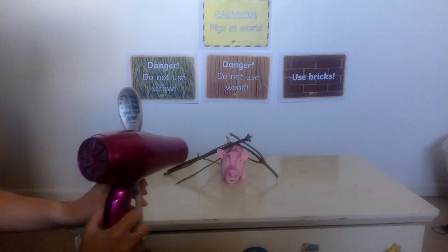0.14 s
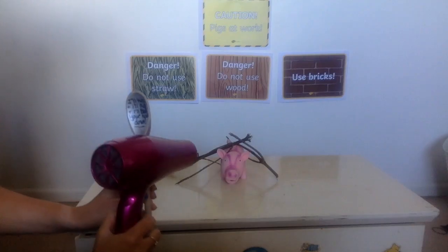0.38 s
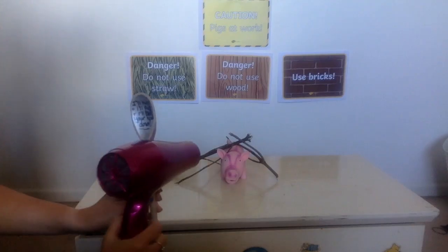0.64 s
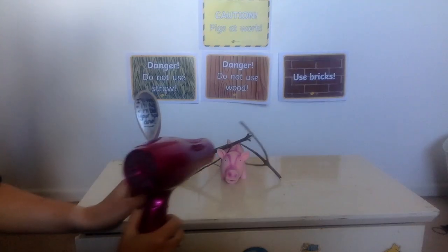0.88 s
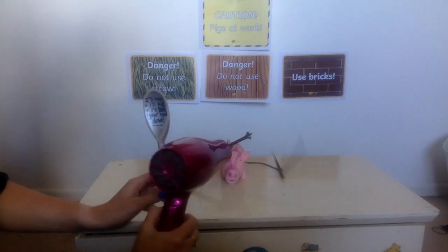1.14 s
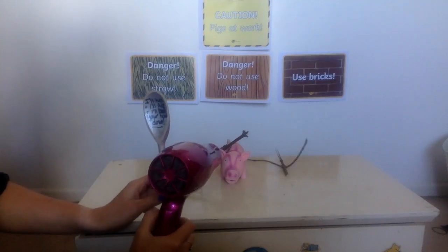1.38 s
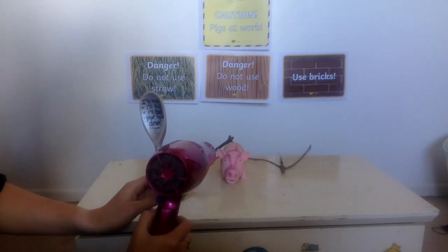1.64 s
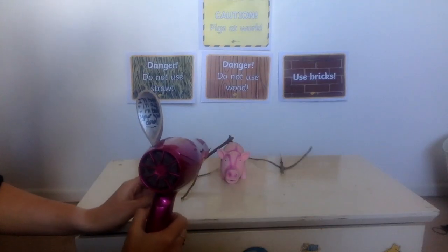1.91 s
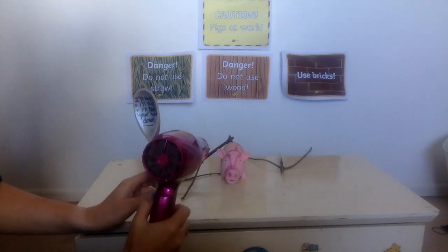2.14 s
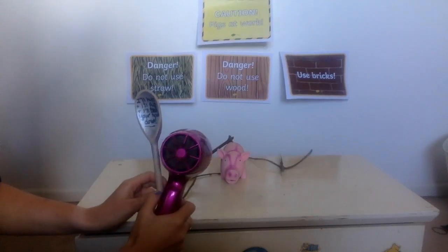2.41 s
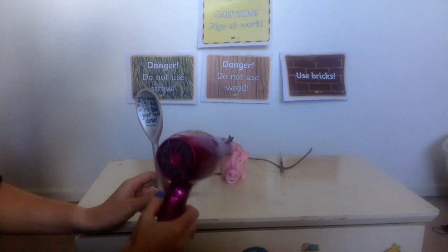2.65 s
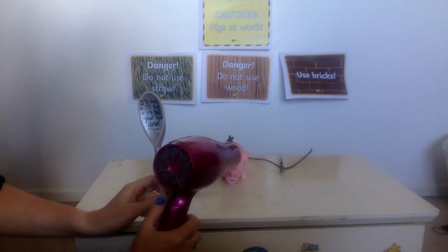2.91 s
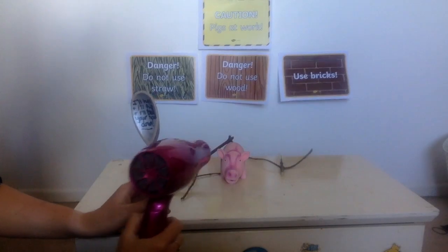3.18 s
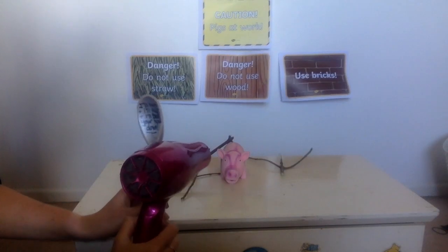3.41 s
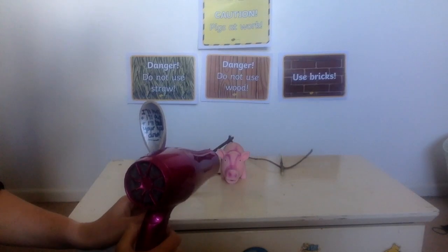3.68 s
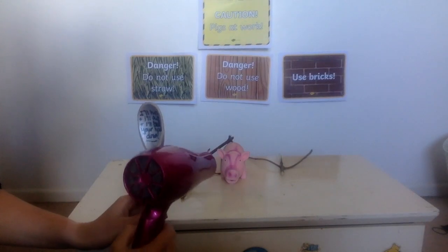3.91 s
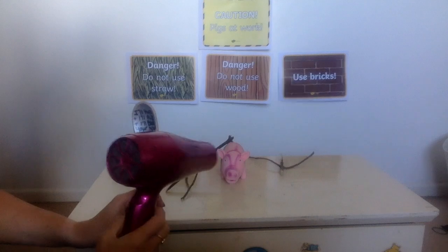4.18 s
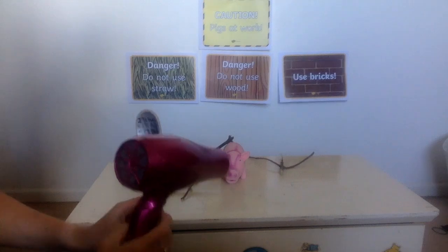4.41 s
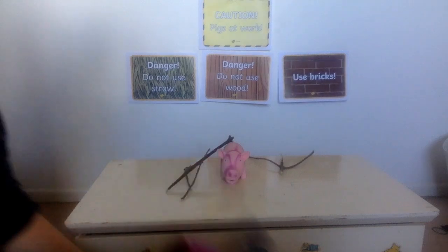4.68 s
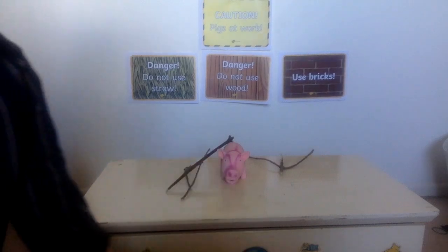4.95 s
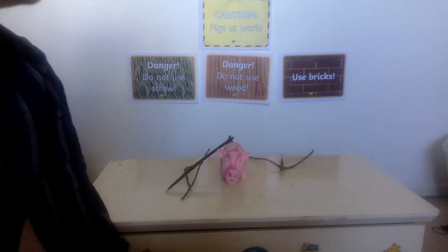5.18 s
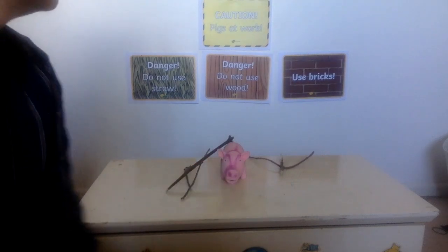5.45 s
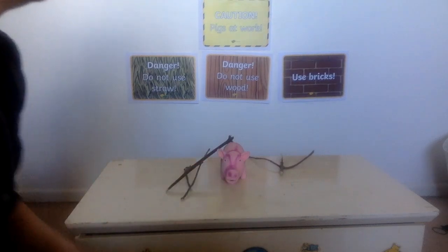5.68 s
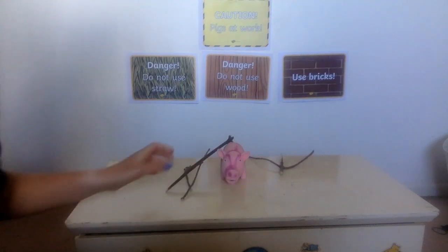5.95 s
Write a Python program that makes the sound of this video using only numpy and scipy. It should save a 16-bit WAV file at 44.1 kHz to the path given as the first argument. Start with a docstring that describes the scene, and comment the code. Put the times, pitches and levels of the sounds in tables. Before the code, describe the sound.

Almost silent at first, with only a very faint hush. At about 0.15 s a handheld hairdryer starts: a rough little whirr rises, a plastic click snaps at 0.26 s, and the motor whine sweeps upward, reaching nearly full speed by 0.9 s. A loud, broad rush of air holds with a steady fan tone near 1600 Hz and thinner tones above. Between 1.25 and 1.8 s twigs knock lightly on a wooden cabinet top. From about 2.8 s the hiss grows duller and more fluttery, and the whine stands out strongest from 3.3 s. It is switched off at 4.0 s with a tiny click; the whine slides down and vanishes by 4.6 s while air fades until 5.4 s. A short squeak at 4.65 s and small rattle at 4.82 s follow, then scrapes, a faint high whistle, and knocks from 5.45 to 5.75 s, ending with a soft tap near 6 s. Small room, one microphone, little bass.

```python
"""A handheld hairdryer runs up, blows at a heap of twigs on a wooden cabinet and is switched off, in a small room.
Six-blade fan: sines locked to one shaft speed, over air noise split into flickering bands; its treble dulls.
Twig knocks ring cabinet modes; clicks and scrapes are noise bursts; a squeak is a stick-slip tone.
A small part rattles, a thin whistle lies over the scrape, and a faint hush lies under all; one microphone."""
import sys
import numpy as np
from scipy import signal
from scipy.fft import rfft, irfft
from scipy.io import wavfile
from scipy.ndimage import uniform_filter1d

SR = 44100
rng = np.random.default_rng(int(sys.argv[2]) if len(sys.argv) > 2 else 0)


def level_to_linear(level):
    """Convert decibel levels to linear amplitude factors, elementwise."""
    exponent = np.asarray(level, float) / 20
    return 10 ** exponent


def wav_record(signal):
    """Record a signal, one row per channel, as 16-bit PCM in the file named by sys.argv[1]."""
    frames = np.transpose(np.atleast_2d(signal))
    bounded = np.clip(frames, -1, 1)
    # unit amplitude maps onto the largest positive 16-bit level
    quanta = np.round(bounded * 32767).astype(np.int16)
    wavfile.write(sys.argv[1], SR, quanta)


N = 267907
T = np.arange(N) / SR

# fan shaft running up, steady, coasting after the switch: time_s, speed_hz
SHAFT_SPEED = [(.147, 89.07), (.25, 121.5), (.36, 158), (.49, 201.8), (.57, 226.3), (.67, 244.8),
               (.76, 254.7), (.9, 265.4), (1.05, 268.4), (1.8, 270), (4.0, 270.3), (4.11, 232.2),
               (4.2, 218.3), (4.36, 156.5), (4.5, 110), (4.62, 90.8), (4.9, 62), (5.1, 44.7), (5.4, 25)]
# whine levels, swelling and dipping as the gliding tones cross resonances, as at full speed:
# time_s, blade_tone_db, order_12_db, order_15_db
WHINE_LEVELS = [(.36, -44, -56, -48), (.48, -29, -42, -38), (.58, -41, -30, -41.5), (.68, -33, -30.5, -40),
                (.78, -32, -34, -44.5), (1.1, -29, -32.5, -34), (1.45, -28, -33, -31.5),
                (1.85, -27, -28, -30.5), (2.15, -29, -32, -32), (2.6, -32, -41, -40),
                (3.03, -31, -34, -39.5), (3.32, -19.5, -41.5, -37), (3.95, -23, -47, -35.5),
                (4.08, -25.5, -36, -47), (4.16, -39, -32, -50), (4.26, -24, -36, -52),
                (4.38, -25, -64, -55), (4.55, -48, -50, -48)]
# weaker motor orders: multiple_of_shaft_speed, relative_db
MOTOR_ORDERS = [(1, -16.5), (2, -19), (3, -8), (7, -4.5), (8, -12), (9, -10.5), (10, -1), (11, -1),
                (13, -6.5), (14, -4), (16, -11), (17, -13), (20, -17), (25, -10.5)]
# tones stand out of the air between these times: time_s
TONE_SPAN = [(0.34,), (4.6,)]
# treble dulling and loudness of the dryer: time_s, dulled_0_to_1, loudness_db
DULLING = [(.142, 0, -4.5), (.2, 1, -5.7), (.3, 0.31, 1.7), (1.2, 0.11, 0.34), (2.35, 0.01, -0.68),
           (2.8, 0.35, 0.5), (3.1, .55, 0.3), (3.55, 0.96, 0.5), (4, .95, -0.7), (4.15, 1, -1),
           (4.25, 0.78, -2.5), (4.32, 0.6, -6), (4.45, 0.48, -5), (5, 0.73, -3.5), (5.2, .7, -15.5)]
# air spectrum, relative within each part: freq_hz, density_db_per_hz
AIR_SPECTRUM = [(35, -73.5), (60, -45), (203, -31), (262, -29), (429, -15), (555, -16), (1320, -11.5),
                (1590, -4.5), (1750, -5.5), (4680, -5.5), (7480, -9), (14800, -9.5), (16200, -22)]
# housing resonances, negative = notch: freq_hz, width_hz, gain_db
HOUSING_MODES = [(100, 23, 7.5), (270, 75, 10), (560, 63, 11), (713.4, 24, 12.5), (796, 42, 9.5),
                 (1190, 92, -7), (1220, 36, 10), (2045, 48, 8), (2770, 240, 3), (4650, 100, 6),
                 (6860, 300, 4.5), (7480, 1800, -5), (9250, 600, 0.5), (10680, 1000, 5), (13300, 300, 0.5),
                 (14700, 1400, 4.5)]
# rippled colour change at full dulling: freq_hz, gain_db
DULLED_COLOUR = [(40, 2.5), (300, -6), (800, 3.5), (2100, 1.5), (2900, 1), (3400, -2), (4700, 1.5),
                 (5500, -5), (6200, 5), (6800, 6), (8000, -1.5), (9100, 6), (10200, -4.5), (11200, 2),
                 (12300, -5.5), (13300, 4), (14300, -6.5), (15300, 2.5), (16500, 0)]
# colour change that sets in just after switch-off, before OFF_SHARE: freq_hz, gain_db
OFF_COLOUR = [(40, 12), (300, 4.5), (700, 1.5), (1600, 2.5), (2100, 8), (2800, 7), (3300, 1), (3700, 7.5),
              (5500, -10), (7000, -8), (16500, -9)]
# rough rising whirr of the still slow blades: time_s, pitch_hz, level_db
WHIRR_CURVE = [(.145, 588, -75), (.17, 632, -60), (.21, 740, -55), (.25, 782, -51.5), (.3, 790, -47),
               (.36, 794, -71)]
# knocks on the cabinet top, before the room: start_s, peak_db, contact_ms
KNOCK_BLOWS = [(1.254, -23, 0.99), (1.273, -23.5, 1.7), (1.29, -28, 0.5), (1.434, -28.5, 2.3),
               (1.549, -29, 1.29), (1.617, -29, 2), (1.799, -35.5, 1.27), (5.17, -52.5, 8.3),
               (5.187, -62, 6.9), (5.482, -36, 5.6), (5.552, -21, 0.83), (5.565, -23.5, 2.8),
               (5.663, -30, 0.42), (5.681, -28.5, 0.78), (5.727, -41, 1.9), (5.996, -39, 6.1),
               (6.011, -50, 5.9)]
# cabinet top modes: freq_hz, relative_db, t60_s
CABINET_MODES = [(100, -10, 0.05), (157, -4, 0.091), (260, -5.5, 0.15), (295, 0.5, 0.057), (328, 2.5, 0.12),
                 (420, -5.5, .03), (480, -4, 0.056), (610, -5, .03), (730, -7, .04), (868, -3.5, .04),
                 (1010, -3.5, .05), (1250, -8, .03), (1500, -10, .03), (1906, -12, .02)]
# clicks, taps, scrapes of plastic and twigs: start_s, undecayed_db, centre_hz, t60_s, treble_re_body_db
CLICK_BURSTS = [(0.264, -17.5, 3900, 0.032, -1.5), (.267, -32, 7800, .07, 1),
                (0.271, -25.5, 3740, 0.088, 0.5), (1.255, -17.5, 890, 0.095, -25),
                (1.55, -25, 899, .07, -25), (3.995, -24.5, 13430, 0.074, -13),
                (4.233, -34, 14000, 0.048, -12), (4.813, -41.5, 4000, 0.046, -15),
                (5.468, -34.5, 1100, 0.069, -13), (5.47, -41.5, 2300, .065, -8),
                (5.476, -50.5, 4140, 0.14, 4), (5.519, -36, 1200, 0.09, -25),
                (5.521, -44, 2980, 0.092, -17), (5.556, -35, 1190, 0.063, -40),
                (5.678, -24, 2880, 0.094, -6.5), (5.68, -35, 7800, .09, -7), (5.681, -32, 4550, 0.14, -7),
                (5.685, -34.5, 1240, 0.098, -20), (5.95, -46.5, 1635, 0.13, -28),
                (5.987, -47.5, 3580, 0.1, -1), (5.991, -42.5, 1090, 0.071, -12)]
# blows on a small plastic part: start_s, relative_db
RATTLE_BLOWS = [(4.823, -33.5), (4.829, -39), (4.838, -46), (4.841, -45)]
# modes of the part: freq_hz, relative_db, t60_s
PART_MODES = [(1780, -8.5, 0.028), (2920, -15, .03), (3900, -7, .03), (4270, -2, .035), (4780, -1.5, 0.026),
              (7800, -8.5, 0.024)]
# squeak slips, first long and clean: middle_s, length_s, slip_rate_hz, relative_db, half_rate_re_main_db
SLIPS = [(4.662, 0.043, 1567, -26.5, -33), (4.687, 0.0066, 1464, -36, -8), (4.7, 0.018, 1407, -30.5, -13),
         (4.718, 0.02, 1336, -36.5, -1), (4.731, 0.006, 1367, -36, -4), (4.752, 0.034, 1407, -49, -6)]
# thin whistle over the scrape: time_s, pitch_hz, level_db
WHISTLE_CURVE = [(5.43, 12800, -72), (5.45, 13300, -56), (5.48, 13600, -47), (5.508, 13300, -53),
                 (5.514, 14100, -50), (5.53, 13300, -57), (5.545, 12200, -73), (5.565, 11500, -67),
                 (5.59, 10500, -80)]
# hush spectrum, relative: freq_hz, density_db_per_hz
HUSH_SPECTRUM = [(35, -33.5), (60, 9), (348, -3), (686, -13.5), (908, -13), (1290, -15), (4790, -12),
                 (6200, -19), (16200, -17)]

FULL_SPEED_HZ, SWITCHED_OFF_S, OFF_RAMP_S, OFF_SHARE = 270, 4.0, 0.048, 0.54
# levels at full speed; *_POWER = exponent of the speed ratio
RUSH_DB, HISS_DB, ROAR_DB = -22.5, -21, -34
RUSH_POWER, HISS_POWER, ROAR_POWER, TONE_POWER = 3.1, 3.25, 2.17, 2.5
# *_DULLED_DB = change at full dulling
ORDERS_DB, ORDERS_DULLED_DB = -35, -4
ORDER_18_DB, ORDER_18_DULLED_DB = -43, 6
HISS_DULLED_DB = -14.5
# scale of the band flicker
HISS_FLUTTER_DB, HISS_DULLED_FLUTTER_DB = 0.8, 3
RUSH_FLUTTER_DB, RUSH_OFF_FLUTTER_DB, ROAR_FLUTTER_DB = 1.13, 0.5, 1.5
SQUEAK_TRIPLE_DB = -12  # against the half-rate tone
HUSH_DB = -77
ROOM_T60_S, ROOM_TREBLE_T60_S, ROOM_DB, TAIL_S = 0.35, 0.11, -10.5, 0.082
MIC_LOW_HZ, MIC_TOP_HZ = 85, 15800


def columns(table):
    """Each column of a curve table at every sample, end values held."""
    s, *rest = np.transpose(table)
    return [np.interp(T, s, c) for c in rest]


def level(x, db):
    """Scale to an rms level."""
    return x * level_to_linear(db) / np.sqrt(np.mean(x ** 2))


def walk(rate_hz):
    """Random levels held 1 / rate_hz and slewed twice; spread near 1."""
    n, hold = N // 8 + 1, int(SR / 8 / rate_hz)  # at SR / 8
    coarse = np.repeat(rng.standard_normal(n // hold + 1), hold)
    coarse = uniform_filter1d(uniform_filter1d(coarse, hold), hold)[:n]
    return 1.3 * np.repeat(coarse, 8)[:N]


def colour_db(hz, points):
    """A spectrum joined on a log-frequency axis, -90 dB outside."""
    f, db = np.transpose(points)
    return np.interp(np.log(hz + 1), np.log(f), db, left=-90, right=-90)


def tone(hz, db):
    """A sine at an rms level that follows a pitch curve."""
    phase = np.cumsum(hz) / SR + rng.random()
    return np.sqrt(2) * level_to_linear(db) * np.sin(2 * np.pi * phase)


def during(table):
    """One while a table sounds, with 10 ms fades."""
    return np.clip(np.minimum(T - table[0][0], table[-1][0] - T) / 0.01, 0, 1)


def with_speed(power):
    """Level change in dB as the shaft leaves full speed."""
    return 20 * power * np.log10(columns(SHAFT_SPEED)[0] / FULL_SPEED_HZ)


def fan():
    """Blade tone and motor orders on one trembling shaft; tones roughen while speed slides past room modes."""
    hz = uniform_filter1d(columns(SHAFT_SPEED)[0], size=2600)
    blade_db, order_12_db, order_15_db = columns(WHINE_LEVELS)
    dulled, loudness_db = columns(DULLING)
    slide_hz_per_s = uniform_filter1d(np.abs(np.gradient(hz)) * SR, size=2000)
    slide = np.clip(slide_hz_per_s / 200, 0, 1.5)
    hz = hz * (1 + (0.0006 + 0.0032 * slide) * walk(70))

    blade_hz = 6 * hz * (1 + 0.018 * slide * walk(160))
    steady_db = 0.8 * walk(6) + 1.1 * walk(45)
    sliding_db = slide * (1.3 * walk(25) + 1.6 * walk(90))
    out = tone(blade_hz, blade_db + steady_db + sliding_db)

    coasting = T > SWITCHED_OFF_S
    order_18_db = ORDER_18_DB + ORDER_18_DULLED_DB * dulled - 7 * slide * coasting
    orders = [(12, order_12_db), (15, order_15_db), (18, order_18_db)]
    for k, db in MOTOR_ORDERS:
        orders.append((k, db + ORDERS_DB + ORDERS_DULLED_DB * dulled + 1.5 * walk(5)))
    for k, db in orders:
        order_hz = k * hz * (1 + 0.009 * slide * walk(160))
        loss_db = 12 * slide if k < 4 or k > 22 else 0  # lowest and highest orders fade in a slide
        out += tone(order_hz, db - loss_db + 2.0 * walk(24.926) + 1.7 * slide * walk(90))
    return out * level_to_linear(with_speed(TONE_POWER) + loudness_db) * during(TONE_SPAN)


def air(echo):
    """Turbulence through housing and room modes, in narrow bands that each flicker alone."""
    dulled, loudness_db = columns(DULLING)
    off = OFF_SHARE * np.clip((T - SWITCHED_OFF_S) / OFF_RAMP_S, 0, 1)
    roar_db = ROAR_DB + with_speed(ROAR_POWER)
    rush_db = RUSH_DB + with_speed(RUSH_POWER)
    hiss_db = HISS_DB + with_speed(HISS_POWER) + HISS_DULLED_DB * dulled
    rush_flutter_db = RUSH_FLUTTER_DB + RUSH_OFF_FLUTTER_DB * off
    hiss_flutter_db = HISS_FLUTTER_DB + HISS_DULLED_FLUTTER_DB * dulled
    parts = [(40, 1150, roar_db, ROAR_FLUTTER_DB, 8),  # low_hz, high_hz, level_db, flutter_db, bands
             (1167, 5600, rush_db, rush_flutter_db, 14),
             (5666, 16500, hiss_db, hiss_flutter_db, 26)]

    hz = np.fft.rfftfreq(N, 1 / SR)
    db = colour_db(hz, AIR_SPECTRUM)
    db = db + sum(g / (1 + (2 * (hz - f) / w) ** 2) for f, w, g in HOUSING_MODES)
    noise = rfft(rng.standard_normal(N)) * level_to_linear(db) * rfft(echo, N)
    gust_db = 0.16 * walk(7.7)
    out = 0
    for low_hz, high_hz, part_db, flutter_db, count in parts:
        edges_hz = np.geomspace(low_hz, high_hz, num=count + 1)
        part, power = 0, 0
        for a, b in zip(edges_hz, edges_hz[1:]):
            inside = (hz >= a) & (hz < b)
            mid_hz = np.sqrt(a * b)
            change_db = dulled * colour_db(mid_hz, DULLED_COLOUR) + off * colour_db(mid_hz, OFF_COLOUR)
            gain = np.sqrt(np.sum(level_to_linear(2 * db[inside]))) * level_to_linear(change_db)
            flicker = level_to_linear(flutter_db * (walk(35) + 0.12 * walk(1.9)))
            part = part + level(irfft(noise * inside, N), 0) * gain * flicker
            power = power + gain ** 2
        out = out + part / np.sqrt(power) * level_to_linear(part_db + loudness_db + gust_db)
    return out * during(SHAFT_SPEED)


def whirr():
    """A wavering, rising tone of the still slow blades."""
    hz, db = columns(WHIRR_CURVE)
    return tone(hz * (1 + 0.11 * walk(160)), db + 5 * walk(83.3)) * during(WHIRR_CURVE)


def ring_mode(mode, t, weight_db):
    """One reweighted mode: a sine that decays by 60 dB in its t60."""
    hz, db, t60 = mode
    return level_to_linear(db + weight_db) * np.sin(2 * np.pi * hz * t) * 1000. ** (-t / t60)


def knocks():
    """A push with a short chatter rings the cabinet modes; each blow lands elsewhere and weights them anew."""
    out, t = np.zeros(N + SR), T[:SR // 4]
    for s, db, contact_ms in KNOCK_BLOWS:
        modes = 0
        for k, mode in enumerate(CABINET_MODES):
            modes = modes + (-1) ** k * ring_mode(mode, t, 2.5 * rng.standard_normal())
        chatter = np.zeros(40 * 30)  # 40 contacts, 30 samples apart
        chatter[::30] = 0.25 * rng.standard_normal(40) * np.exp(-np.arange(40) / 14)
        chatter[0] = 1
        push = np.hanning(int(max(contact_ms, 0.1) * SR / 1000) + 3)
        ring = np.convolve(modes, np.convolve(chatter, push))[:len(t)]
        out[int(s * SR):][:len(t)] += level_to_linear(db) * ring / np.abs(ring).max()
    return out[:N]


def band(x, low_hz, high_hz, db):
    """Band-passed signal at an rms level."""
    return level(signal.sosfilt(signal.butter(3, [low_hz, high_hz], "band", fs=SR, output="sos"), x), db)


def clicks():
    """Grainy bursts of small contacts: a band around the body's pitch plus a sizzle of treble."""
    out, t = np.zeros(N + SR), T[:SR // 4]
    for s, db, hz, t60, treble_db in CLICK_BURSTS:
        noise, size = rng.standard_normal((2, len(t)))
        grains = noise * level_to_linear(2.6 * np.repeat(size, 100)[:len(t)])  # 100-sample grains
        half_hz = min(hz * 0.85, 4500) / 2
        body = band(grains, hz - half_hz, hz + half_hz, db)
        sizzle = band(grains, 10000, 15600, db + treble_db)
        envelope = np.clip(t / (0.063 * t60), 0, 1) * 1000. ** (-t / t60)
        out[int(s * SR):][:len(t)] += (body + sizzle) * envelope
    return out[:N]


def rattle():
    """Each blow rings the part's modes with new weights."""
    out, t = np.zeros(N), T[:SR // 8]
    for s, db in RATTLE_BLOWS:
        ring = sum(ring_mode(mode, t, 4.4 * rng.standard_normal()) for mode in PART_MODES)
        out[int(s * SR):][:len(t)] += level_to_linear(db) * ring * np.clip(t / 0.00084, 0, 1)
    return out


def squeak():
    """Stick-slip tone in short swells; every second slip is weaker, which adds the half rate."""
    _, hz, _, half_db = columns(SLIPS)
    unsteady = np.clip((T - SLIPS[0][0]) / 0.024, 0, 1)  # later slips
    hz = hz * (1 + 0.015 * unsteady * walk(150))
    swell = 0
    for s, length_s, _, db, _ in SLIPS:
        swell = swell + level_to_linear(db) * np.cos(np.pi * np.clip((T - s) / length_s, -0.5, 0.5)) ** 1.06
    return swell * (tone(hz, 0) + tone(hz / 2, half_db) + tone(3 * hz, half_db + SQUEAK_TRIPLE_DB))


def whistle():
    """A thin high sine gliding over the scrape."""
    return tone(*columns(WHISTLE_CURVE)) * during(WHISTLE_CURVE)


def hush():
    """Steady noise shaped to the background spectrum."""
    gain = level_to_linear(colour_db(np.fft.rfftfreq(N, 1 / SR), HUSH_SPECTRUM))
    return level(irfft(rfft(rng.standard_normal(N)) * gain, N), HUSH_DB)


def room():
    """Response: direct sound plus a diffuse tail, thin in the bass, with the treble dying first."""
    t = T[:SR // 2]
    noise = signal.lfilter(*signal.butter(1, 400, "high", fs=SR), rng.standard_normal(len(t)))
    noise = noise * np.clip(t / 0.006, 0, 1)
    low = signal.lfilter(*signal.butter(2, 4000, fs=SR), noise)
    tail = low * 1000. ** (-t / ROOM_T60_S) + (noise - low) * 1000. ** (-t / ROOM_TREBLE_T60_S)
    tail *= np.exp(-(t / TAIL_S) ** 4)  # the last of the tail drops away quickly
    return (t == 0) + level_to_linear(ROOM_DB) * tail / np.sqrt(np.sum(tail ** 2))


def scene():
    """Air and short sounds share one room over a faint hush; the squeak is near and drier."""
    echo, rub = room(), squeak()
    short = signal.fftconvolve(knocks() + clicks() + rattle() + 0.53 * rub, echo)[:N] + 0.34 * rub
    mono = fan() + air(echo) + whirr() + short + whistle() + hush()
    return np.array([mono, mono])


def roll_off(x):
    """The treble ends steeply here."""
    return signal.sosfilt(signal.butter(12, 17010, fs=SR, output="sos"), x)


def record(dry):
    """One small microphone with a steep bass cut and a top cut feeds both channels."""
    bass_cut = signal.butter(5, MIC_LOW_HZ, "high", fs=SR, output="sos")
    top_cut = signal.ellip(8, 0.2, 40, MIC_TOP_HZ, fs=SR, output="sos")
    mix = signal.sosfilt(np.vstack([bass_cut, top_cut]), dry)
    return roll_off(mix)


dry = scene()
out = record(dry)
wav_record(out)
```